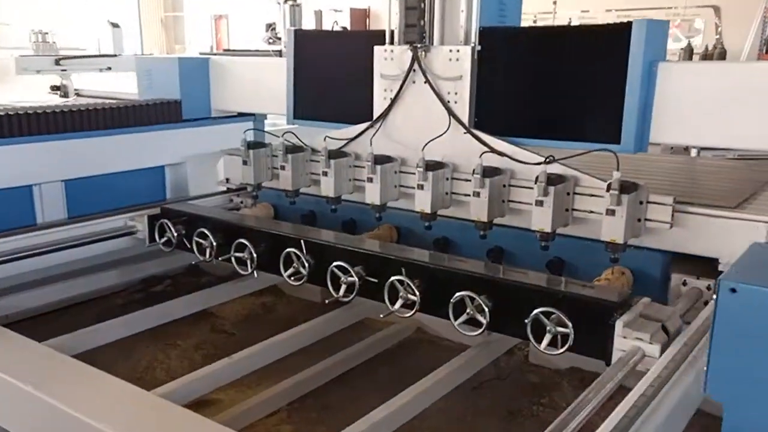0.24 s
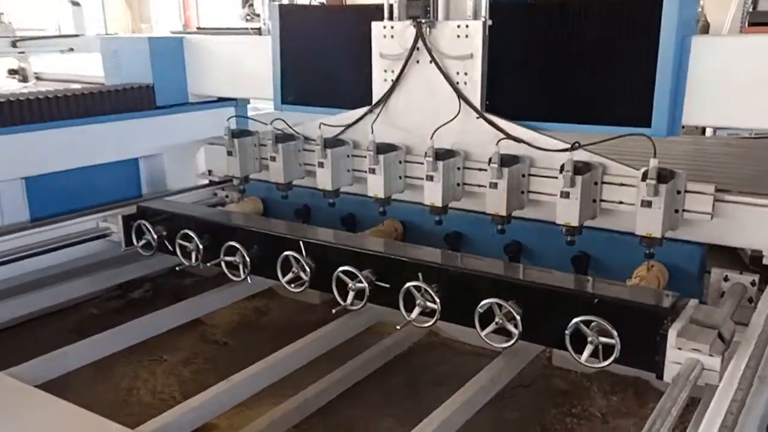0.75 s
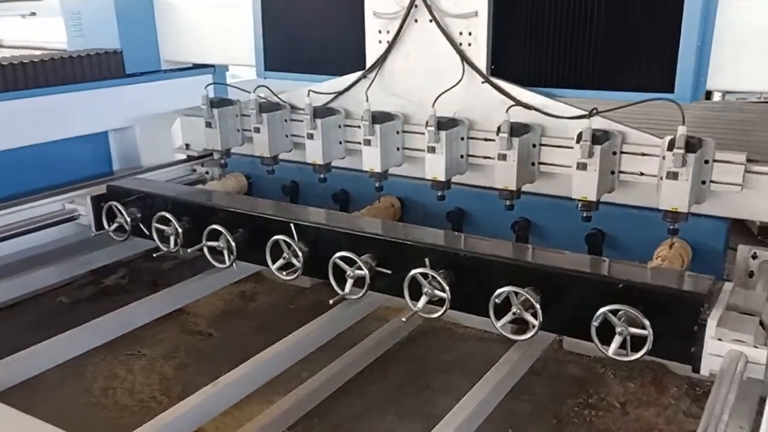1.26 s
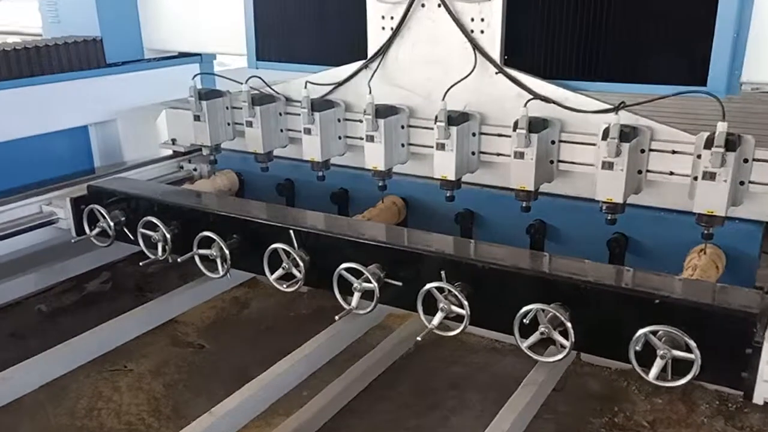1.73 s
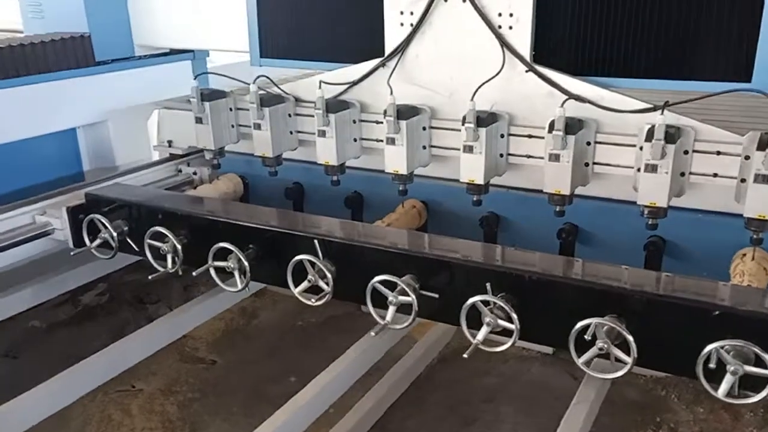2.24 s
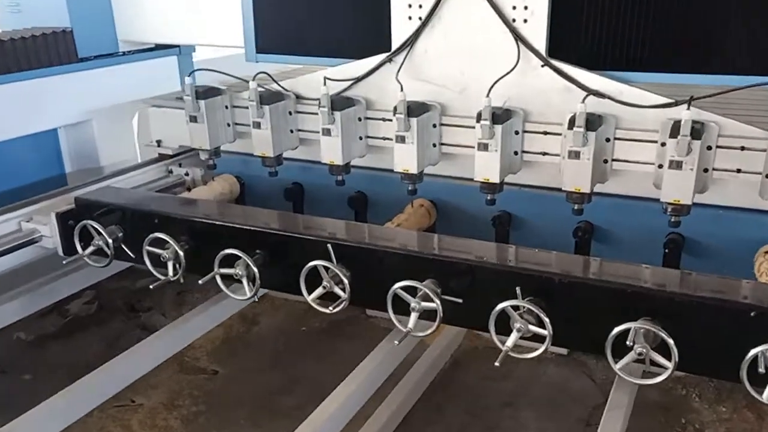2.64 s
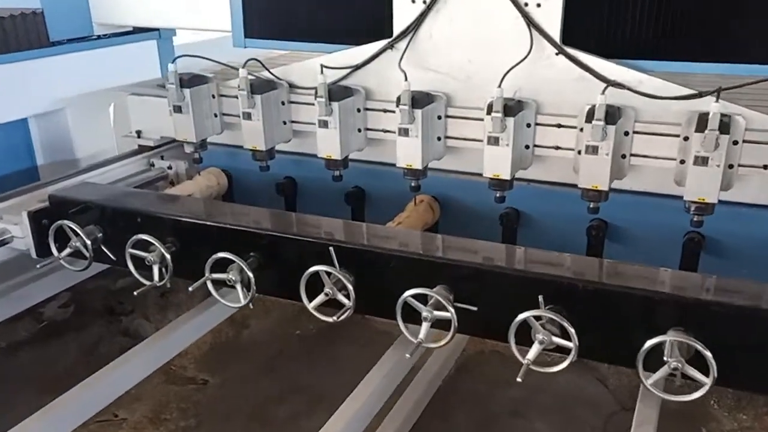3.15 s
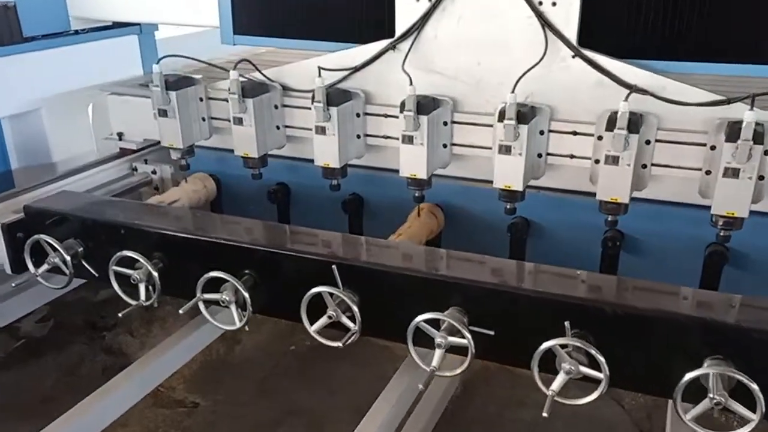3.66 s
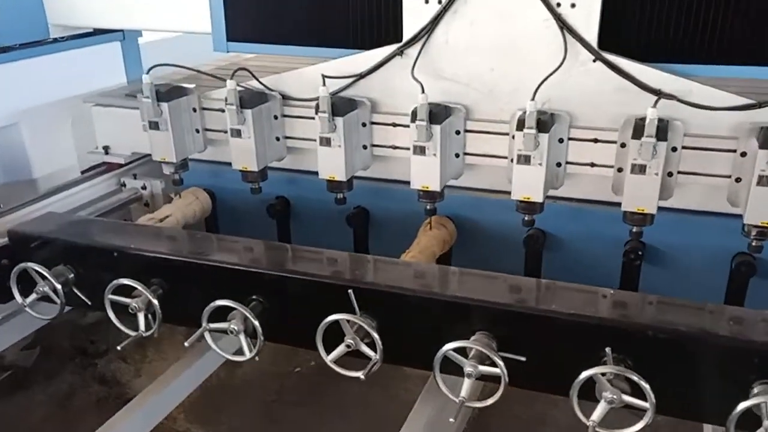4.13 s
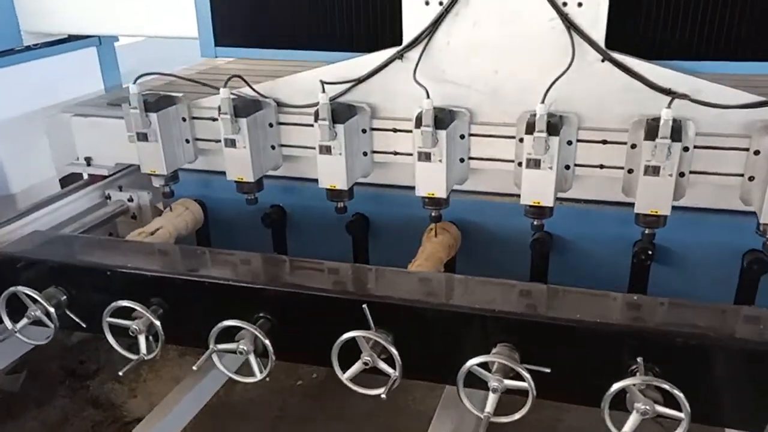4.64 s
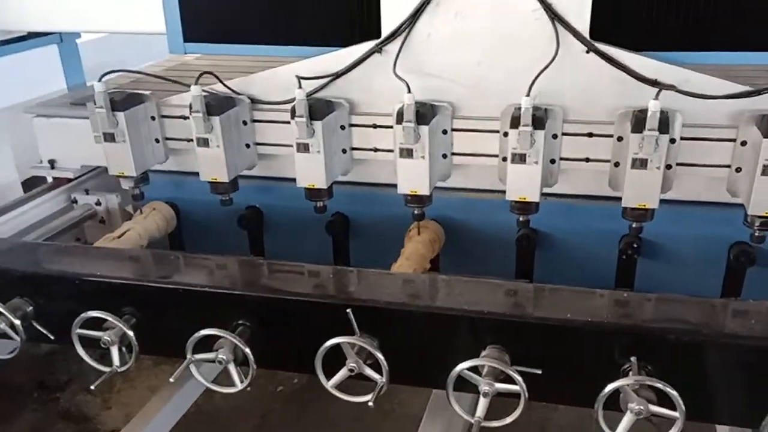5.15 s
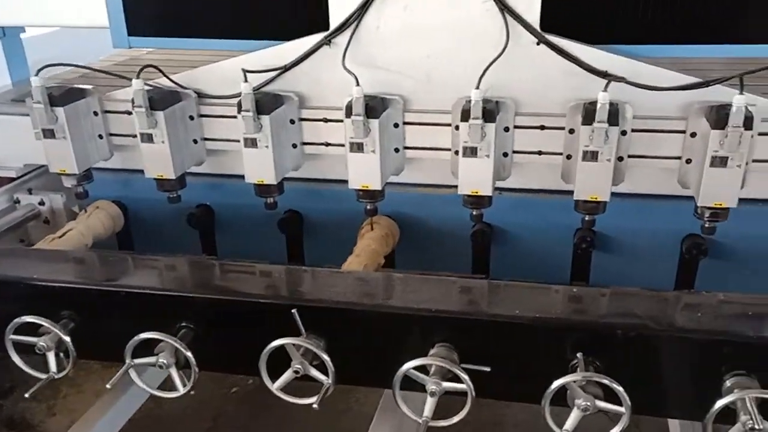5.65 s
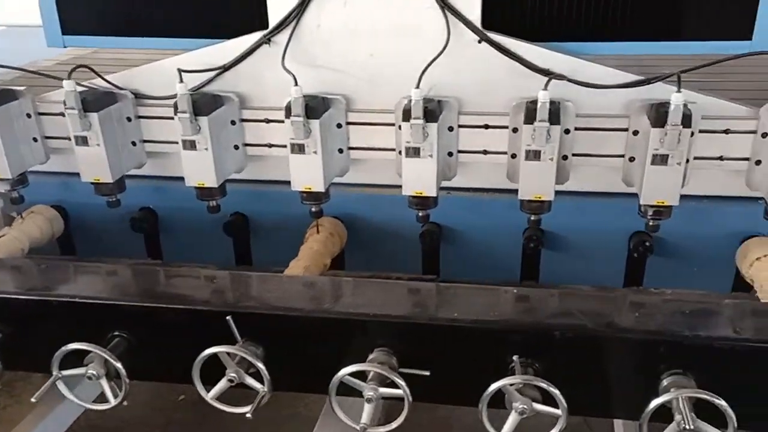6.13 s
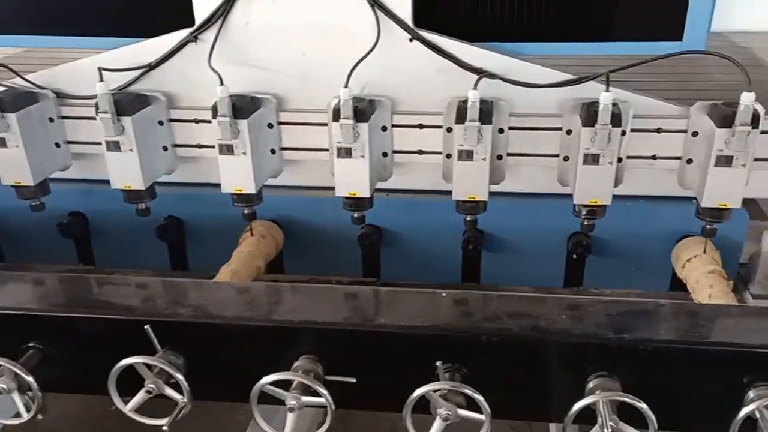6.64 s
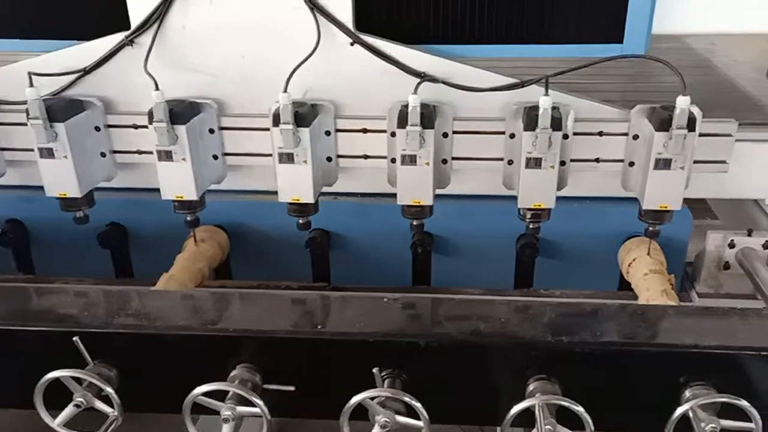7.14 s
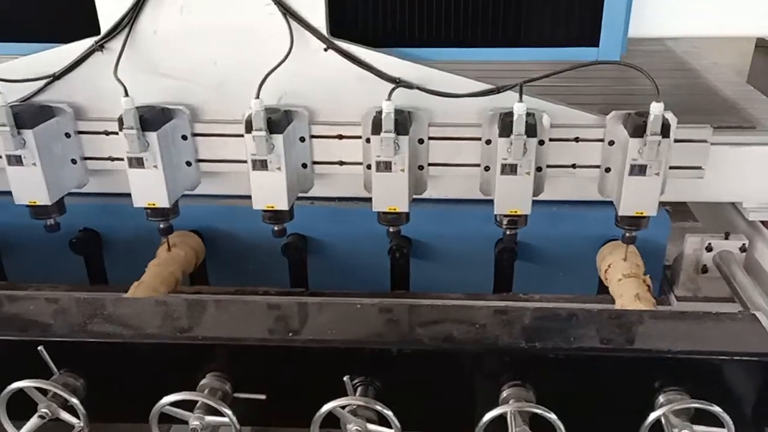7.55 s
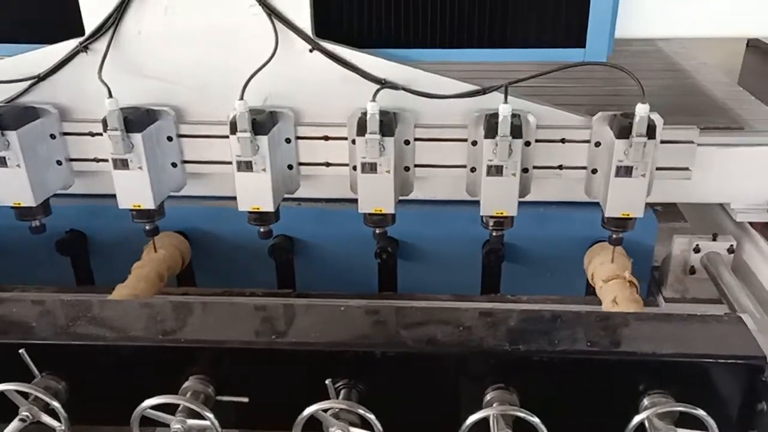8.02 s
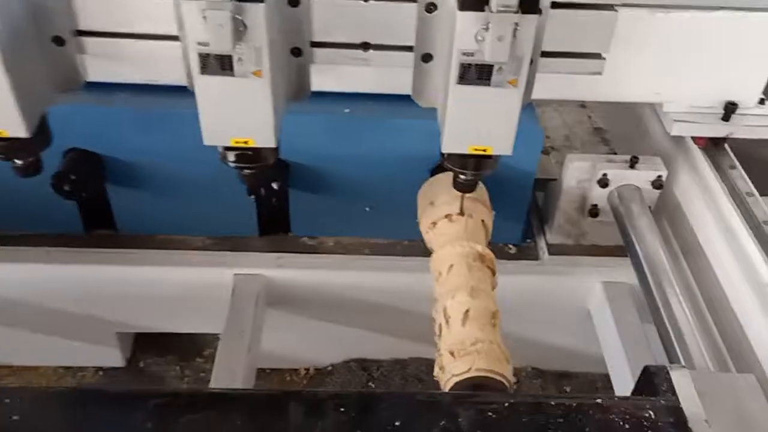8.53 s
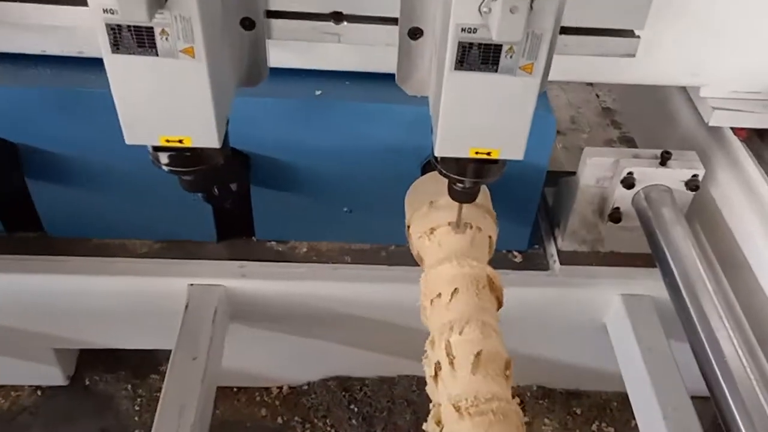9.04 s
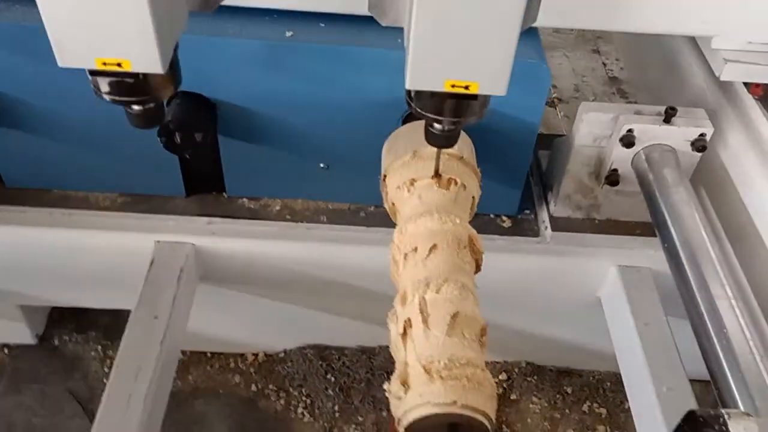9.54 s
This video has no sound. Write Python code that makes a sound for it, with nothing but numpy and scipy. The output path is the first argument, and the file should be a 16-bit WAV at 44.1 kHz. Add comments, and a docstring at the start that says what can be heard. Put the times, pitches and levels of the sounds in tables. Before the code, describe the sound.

Continuous router noise from close range: pitched spindle whine with shimmering harmonics, rushing cooling air, faint thin whistles and low hall rumble. Cutting chatter squeals at the opening, clusters between three and five seconds, and sustains near eight. Tones drift between left and right and sometimes nearly vanish into the hiss. Two soft bumps touch the handheld stereo microphone, with no speech.

```python
"""Woodworking hall: a row of air-cooled router spindles, about 300 rev/s, two-flute bits carving turning blanks.
Shaft orders are fading stereo tones phase-locked to one speed curve; fan blades sing at a fixed speed.
Rumble, roar and fan hiss are shaped noise; chatter is a gated squeal with sidebands spaced at the shaft rate.
Thin whistles hold their pitch; two soft bumps knock a hand-held microphone pair walking along the machine."""
import sys
import numpy as np
from scipy import signal
from scipy.fft import rfft, irfft, next_fast_len
from scipy.io import wavfile
from scipy.ndimage import uniform_filter1d, map_coordinates

SR = 44100
rng = np.random.default_rng(int(sys.argv[2]) if len(sys.argv) > 2 else 0)


def materialize(psi):
    """Save the field psi as 16-bit PCM at rate SR to the path in sys.argv[1].

    A 1-D psi becomes a single channel; in a 2-D psi each row is a channel.
    """
    bounded = np.clip(np.atleast_2d(psi).T, -1, 1)
    quanta = np.round(bounded * 32767).astype(np.int16)
    wavfile.write(sys.argv[1], SR, quanta)


N = 431298


def amp(db):
    """dB to linear gain."""
    return 10 ** (np.asarray(db) / 20)


def unit(x):
    """Scale to rms 1."""
    return x / np.sqrt(np.mean(np.abs(x) ** 2) + 1e-20)


def along(points, hz):
    """Interpolate (f/Hz, value) points on a log frequency axis."""
    f_hz, values = np.transpose(points)
    return np.interp(np.log(hz + 1), np.log(f_hz + 1), values)


def curves(rows):
    """Interpolate each column after t/s to one value per sample."""
    t_s, *columns = np.transpose(rows)
    return [np.interp(np.arange(N) / SR, t_s, column) for column in columns]


def wobble(knots_per_s):
    """Smooth random curve through normal-distributed knots."""
    step = 64  # samples per spline evaluation
    knots = rng.standard_normal(600)
    positions = np.arange(N // step + 2) * step * knots_per_s / SR
    coarse = map_coordinates(knots, [positions], mode="wrap")
    return np.interp(np.arange(N) / step, np.arange(len(coarse)), coarse)


def complex_wobble(knots_per_s):
    """Independent wobbles in phase and in quadrature."""
    return wobble(knots_per_s) + 1j * wobble(knots_per_s)


def filtered(x, response):
    """Apply a response(f/Hz), zero-padded."""
    size = next_fast_len(N + SR // 2)
    f_hz = np.fft.rfftfreq(size, 1 / SR)
    return irfft(rfft(x, size) * response(f_hz), size)[..., :N]


def panned(pair, db):
    """Left up and right down by half of db."""
    return pair * amp(np.array([db, -db]) / 2)


def tone(turns, db, fade, wide_db, rate):
    """Stereo tone in a hall: reflections fade it and reach the two ports at drifting strengths and phases."""
    tremble = 0.1 * complex_wobble(30.)  # fast random tremble in level and phase roughens every tone
    carrier = np.sqrt(2) * amp(db) * np.exp(2j * np.pi * (turns + rng.random()))
    mid = (1 + tremble + fade * complex_wobble(rate)) / np.sqrt(1 + 2 * fade ** 2)
    side = amp(wide_db) * unit(complex_wobble(rate))
    return np.real(carrier * [mid + side, mid - side])


# casing resonances and dips: f/Hz, width/Hz, lift/dB
CASING_MODES = [(816, 23, 8), (1027, 44, 6), (2005, 57, 1.5), (2214, 65, -10), (2428, 103, 9.5),
                (2484, 88, -21.5), (3114, 56, 7.5), (7150, 105, 6)]
# left-right coherence: f/Hz, coherence/1
PORT_COHERENCE = [(30, 0.52), (100, 1), (250, 0.6), (550, 0.19), (1200, 0.086), (2500, 0.033), (8000, .01)]


def rush(spectrum, patchy_db):
    """Noise through the casing modes, in random time-frequency gain patches; mid rms 1."""
    z = signal.stft(rng.standard_normal((2, N)), nperseg=512)[2]
    across_bins = uniform_filter1d(rng.standard_normal(z.shape[1:]), 6, axis=0)
    field = uniform_filter1d(across_bins, 20, axis=1)
    pair = signal.istft(z * amp(patchy_db * unit(field)), nperseg=512)[1][:, :N]

    def mid_side_response(hz):
        lift_db = sum(db / (1 + (2 * (hz - f) / width) ** 2) for f, width, db in CASING_MODES)
        angle = np.arccos(np.clip(along(PORT_COHERENCE, hz), -1, 1)) / 2
        return amp(along(spectrum, hz) + lift_db) * [np.ones_like(hz), np.tan(angle)]

    mid, side = filtered(pair, mid_side_response)
    return np.array([mid + side, mid - side]) / np.std(mid)


# hall rumble level: t/s, level/dB
RUMBLE_LEVEL = [(0.06, -59), (1.08, -57), (2.15, -51), (3.04, -55), (3.71, -54.5), (4.36, -56), (4.76, -54),
                (5.43, -58), (6.07, -59), (7.31, -53.5), (8.89, -55.5), (9.7, -53)]
# relative rumble density before casing lift: f/Hz, density/dB per Hz
RUMBLE_SPECTRUM = [(20, -16), (60, -3.5), (110, 1), (200, 2), (420, -7), (900, -48)]


def rumble():
    """Low noise of the hall, with a wavering level."""
    level_db = curves(RUMBLE_LEVEL)[0] + 2.5 * wobble(4.5)
    return amp(level_db) * rush(RUMBLE_SPECTRUM, patchy_db=-0.8)


# machine air: t/s, roar level/dB, hiss level/dB, hiss left-right/dB (mean removed in use)
AIR_LEVELS = [(0.0, -27, -29.5, -3.5), (0.65, -26, -30, -2.0), (1.47, -26, -30, -1.5), (1.74, -24, -27, -1),
              (2.04, -21.5, -26, -1.5), (2.94, -25, -28, -1.0), (3.49, -23.5, -27.5, 0),
              (3.87, -25, -28, 0.5), (4.22, -26, -30, -1.0), (4.79, -26, -29.5, -0.5),
              (5.23, -28, -31.5, -1.0), (5.64, -28, -31.5, -1.5), (5.99, -24, -26, -0.5),
              (6.18, -22, -25.5, -1.5), (6.45, -22.5, -27, -2.5), (6.62, -25, -28, 0), (7.0, -24, -27, -1),
              (7.33, -23.5, -27, -2.0), (7.68, -27.5, -30, -2.5), (8.33, -29, -32, -3.5),
              (8.5, -27.5, -31, -2), (8.83, -28.5, -31, 0.5), (9.15, -24, -25.5, 1.0),
              (9.78, -25.5, -29, 4.5)]
# relative densities before casing lift: f/Hz, density/dB per Hz
ROAR_SPECTRUM = [(100, -75), (240, -20), (390, -20), (540, -6), (720, -8.5), (900, -6.5), (1290, -8.5),
                 (1740, -2), (2350, 2.5), (2960, 0), (3080, -23), (3600, -15), (7900, -75)]
HISS_SPECTRUM = [(1760, -62), (3000, -9), (5380, -8.5), (6800, -4.5), (7860, -9), (9390, -7.5),
                 (10600, -21.5), (11600, -15.5), (12200, -29), (13300, -15), (14100, -26), (14600, -35),
                 (15100, -49), (15500, -21)]


def air():
    """Broadband roar of the frame and hiss of the cooling fans."""
    roar_db, hiss_db, pan_db = curves(AIR_LEVELS)
    roar = amp(roar_db + 0.11 * wobble(1.9)) * rush(ROAR_SPECTRUM, patchy_db=1.78)
    hiss = amp(hiss_db + 0.56 * wobble(5.)) * rush(HISS_SPECTRUM, patchy_db=1.1)
    return roar + panned(hiss, pan_db - pan_db.mean())


def fan_blades():
    """Blade-passing tone of the idle spindles: fixed speed, level tied to the fan hiss."""
    blades, idle_rev_per_s, blade_re_hiss_db = 22, 299.7, -10
    turns = blades * idle_rev_per_s * np.arange(N) / SR
    level_db = curves(AIR_LEVELS)[1] + blade_re_hiss_db
    return tone(turns, level_db, fade=0.7, wide_db=-1.5, rate=7.7)


# thin whistles, perhaps of the motor drives: f/Hz, level/dB
WHISTLES = [(5302, -53), (10692, -63), (12495, -65)]


def whistles():
    """Fixed-pitch thin tones, independent of the shaft."""
    t_s = np.arange(N) / SR
    return sum(tone(hz * t_s, db, fade=.5, wide_db=-1.5, rate=5.) for hz, db in WHISTLES)


# soft bumps against the microphones: t/s, level/dB, f/Hz, t60/s
BUMPS = [(3.312, -39, 168, 0.092), (9.274, -36, 110, 0.022)]


def knocks():
    """Each bump: a decaying low push with a puff of smoothed noise, added equally to both ports."""
    out, t_s = np.zeros(N + SR), np.arange(SR // 5) / SR
    for start_s, db, hz, t60_s in BUMPS:
        puff = 1.9 * uniform_filter1d(rng.standard_normal(len(t_s)), size=30)
        push = np.sin(2 * np.pi * hz * t_s) + puff
        envelope = amp(db - 60 * t_s / t60_s) * (1 - np.exp(-t_s / .001))
        out[round(start_s * SR):][:len(t_s)] += envelope * push
    return out[:N]


# carving spindle speed, slower in a deeper cut: t/s, f/Hz (rev/s)
SHAFT_SPEED = [(0, 299.1), (.5, 299.2), (1.1, 299.95), (2, 299.8), (2.6, 299.5), (3, 299.7), (3.3, 299.1),
               (3.9, 299.1), (4.2, 299.5), (5, 299.1), (5.4, 299.7), (6.2, 299.45), (6.8, 299.6),
               (7.4, 298.95), (8.6, 299.05), (9.78, 299.1)]


def shaft_turns():
    """Integrate shaft speed to revolutions."""
    return np.cumsum(curves(SHAFT_SPEED)[0]) / SR


# chatter spells: t/s, length/s, bit bending f/Hz, final shift/Hz, start level/dB, level drift/dB
CHATTER_SPELLS = [(-.04, 0.79, 2272, -6.5, -21.5, -16), (0.601, 0.096, 2257, 5, -27, 1),
                  (0.744, 0.15, 2280, 61, -25, -8), (3.191, 0.1, 2262, -0.5, -27, 4),
                  (3.315, .13, 2260, 57, -17, -11), (3.678, 0.15, 2262, -9.5, -21, -17),
                  (3.935, .12, 2275, 67, -18.5, -10), (4.438, .1, 2258, -7, -29, -1),
                  (4.603, .11, 2290, 11.5, -30, -1), (4.764, 0.29, 2266, 79, -34, 4),
                  (5.44, 0.12, 2280, 54, -35, 10), (5.97, .15, 2335, 41, -33, 4),
                  (7.156, .275, 2268, 52, -20, -13), (7.449, 1.1, 2270, 80, -24.5, -1),
                  (8.6, 0.081, 2316, -9, -22, -3)]
# sideband offset from the bending pitch: multiples of the shaft rate
SIDEBAND_ORDERS = [-4, -2, -1, 0, 1, 2, 3, 4]
# per sideband order: level re spell/dB (before the loss while leaving), left-right/dB
SIDEBAND_LEVELS = [(-18, 2), (-13, 8), (-22, 0), (0, -4), (-13, -3), (-10, -1), (-20, -3), (-22, 0)]


def chatter():
    """The bit bends at its own pitch; shaft turns chop the squeal into sidebands."""
    attack_s, release_s, shift_s, shift_power = 0.051, .05, .19, 1.2
    leaving_loss_db = -12  # chopping weakens as the bit leaves the wood and the pitch shifts
    turns, t_s = shaft_turns(), np.arange(N) / SR
    hz, level, leaving = np.zeros((3, N))
    for start_s, length_s, pitch_hz, shift_hz, db, drift_db in CHATTER_SPELLS:
        on = (t_s >= start_s) & (t_s < start_s + length_s)
        since_s = t_s[on] - start_s
        left_s = start_s + length_s - t_s[on]
        leaving[on] = np.clip(1 - left_s / min(shift_s, length_s), 0, 1)
        hz[on] = pitch_hz + shift_hz * leaving[on] ** shift_power
        gate = np.clip(np.minimum(since_s / attack_s, left_s / release_s), 0, 1)
        level[on] = amp(db + drift_db * since_s / length_s) * gate
    bending = np.cumsum(hz) / SR
    squeal = np.zeros((2, N))
    for order, (db, pan_db) in zip(SIDEBAND_ORDERS, SIDEBAND_LEVELS):
        sideband_db = db + (order != 0) * leaving_loss_db * leaving
        line = tone(bending + order * turns, sideband_db, fade=0.087, wide_db=-9, rate=2.5)
        squeal += panned(line, np.array([pan_db]))
    octave = tone(2 * bending, -23, fade=.7, wide_db=-3, rate=4.)
    return level * (squeal + octave)


# flute tone, swelling as the bits dig in: t/s, level/dB, left-right/dB
FLUTE_LEVEL = [(0.0, -24, 6), (0.13, -25.5, -17), (0.24, -19.5, -6.0), (0.54, -28.5, 12), (0.71, -22, 4.0),
               (0.79, -31, 25), (0.92, -30.5, -9), (1.01, -19.5, -0.5), (1.42, -38.5, 13), (1.5, -34, 16),
               (1.58, -52, -2.0), (1.69, -35, 4.5), (1.74, -40, -8.5), (1.96, -34, 1), (2.07, -21.5, -8.5),
               (2.37, -18.5, -4.5), (2.45, -28.5, -2.0), (2.53, -34.5, -18), (2.67, -28, 0), (2.75, -20, 1),
               (3.05, -28, 1), (3.27, -17.5, -3.0), (3.43, -20.5, -2), (3.57, -13.5, 1.5),
               (4.08, -16, -5.5), (4.36, -35.5, 2), (4.49, -21, -3), (4.87, -15, -0.5), (5.07, -15.5, 0.5),
               (5.31, -29, 6), (5.42, -26, 3), (5.53, -35, 4), (5.61, -35.5, 24), (5.75, -30, -3.5),
               (5.88, -46, -12), (6.02, -38, 8), (6.1, -19, 0), (6.18, -24.5, 1), (6.29, -26.5, -8),
               (6.45, -20.5, 2), (6.59, -43, -11.0), (6.67, -49, -1), (7.25, -22, 2), (7.35, -27.5, 8),
               (7.41, -29, -8.0), (7.46, -19.5, -3.5), (8.04, -16.5, 2), (8.44, -17.5, 3),
               (8.61, -32.5, 11), (8.69, -34, 16), (8.85, -35.5, -16), (8.91, -42, 1), (9.2, -30, 3.0),
               (9.48, -31.5, -12.5), (9.64, -19, -7.5), (9.78, -17, -1)]


def cutting_effort_db():
    """Flute level about its mean, smoothed over 6000 samples."""
    flute_db = curves(FLUTE_LEVEL)[0]
    return uniform_filter1d(flute_db - flute_db.mean(), size=6000)


# faint shaft orders, multiples of shaft speed
FAINT_ORDERS = [5, 11, 12, 13, 14, 15, 16]
# per faint order: level at mean effort/dB
FAINT_LEVELS = [-41.5, -51, -50, -49, -49.5, -51, -52]


def faint_orders():
    """Weak shaft harmonics; deep random fading stands for beats between nearly equal spindles."""
    turns = shaft_turns()
    follow_db = 0.27 * cutting_effort_db()  # dB per dB of flute tone
    return sum(tone(order * turns, db + follow_db, fade=1.0, wide_db=4.0, rate=5.5)
               for order, db in zip(FAINT_ORDERS, FAINT_LEVELS))


# clear shaft orders, multiples of shaft speed
WHINE_ORDERS = [6, 7, 8, 9, 10]
# per clear order: steady level at mean effort/dB
WHINE_LEVELS = [-39.5, -42, -37.5, -42, -37.5]
# per clear order, swells along the walk through standing waves: t/s, added peak level/dB, Gaussian sigma/s
WHINE_SWELLS = [
    [(1.25, -32, .04), (1.47, -35, 0.032), (2.1, -37, .05), (2.59, -32, 0.06), (2.78, -33, 0.027),
     (3.87, -35, 0.16), (4.82, -34, 0.11), (5.5, -35, 0.077), (6.21, -32.5, .05), (7.33, -30, .07),
     (7.9, -37, 0.042), (8.63, -40, 0.051), (9.66, -33, .05)],
    [(.02, -36, 0.063), (.22, -35, .08), (.52, -34, .05), (.74, -37, .06), (1.03, -36, .04),
     (2.1, -30, 0.054), (3.27, -29, 0.031), (3.88, -24, 0.066), (4.63, -28, 0.054), (5.15, -31, 0.066),
     (5.47, -33, 0.043), (6.07, -29, .04), (6.21, -34, .04), (7.17, -29, .06), (7.36, -26, .05)],
    [(0.01, -37, .05), (.3, -29, 0.12), (.72, -31.5, 0.053), (1.03, -31, 0.1), (1.39, -30, 0.038),
     (2.28, -25, 0.066), (2.7, -26.5, 0.055), (2.86, -25, 0.025), (3.0, -32, 0.034), (3.6, -33, 0.15),
     (4.03, -33, 0.036), (6.3, -31, .1), (7.16, -24, .04), (7.33, -27, .03), (8.47, -35, 0.039),
     (9.48, -23.5, 0.038), (9.7, -32, 0.033)],
    [(.42, -40, .1), (1.09, -37, 0.053), (3.0, -29, .04), (3.27, -29, .04), (3.54, -32, 0.078),
     (7.33, -41, .05), (7.9, -35, .15), (9.12, -33, .06)],
    [(.39, -28, 0.037), (.54, -27, .045), (1.97, -32.5, 0.22), (2.65, -31, .07), (4.6, -36, .07),
     (5.69, -38.5, 0.062), (7.35, -26.5, .08), (7.65, -28, .04), (8.01, -40, .05), (9.12, -34, 0.044),
     (9.45, -31, 0.032), (9.67, -28, 0.057)],
]


def whine():
    """Cutting-edge harmonics: a steady fading part plus standing-wave swells."""
    turns, t_s = shaft_turns(), np.arange(N) / SR
    coarse_s = t_s[::64]
    follow_db = 0.15 * cutting_effort_db()  # dB per dB of flute tone
    sound = np.zeros((2, N))
    for order, db, swells in zip(WHINE_ORDERS, WHINE_LEVELS, WHINE_SWELLS):
        steady = amp(db + follow_db)
        swell = sum(amp(top_db) * np.exp(-((coarse_s - s) / sigma_s) ** 2 / 2)
                    for s, top_db, sigma_s in swells)
        both = steady + np.interp(t_s, coarse_s, swell)
        fade = 0.58 * steady / both  # swells fade less
        sound += both * tone(order * turns, 0, fade=fade, wide_db=-1.5, rate=11.)
    return sound


# levels along the walk of the unbalance hum (shaft order 1), then of shaft orders 3 and 4: t/s, level/dB
HUM_LEVEL = [(0.0, -34.5), (0.22, -52), (0.38, -31), (0.63, -28.5), (1.66, -38), (2.07, -32), (2.45, -40),
             (2.7, -36), (3.02, -39), (3.1, -50.5), (3.65, -31), (4.08, -37), (4.71, -33.5), (4.79, -36),
             (6.18, -25.5), (6.86, -32), (7.41, -27.5), (8.44, -43.5), (8.66, -56), (8.74, -40), (9.2, -36),
             (9.78, -38.5)]
THIRD_LEVEL = [(0.0, -47), (0.49, -41), (0.6, -28), (2.01, -49.5), (2.12, -26), (2.56, -47), (2.75, -37),
               (4.68, -46.5), (4.74, -53), (5.07, -36), (5.31, -56), (5.56, -37), (5.64, -50), (6.45, -37),
               (6.51, -48), (7.38, -46), (7.73, -31.5), (8.8, -43), (9.12, -30.5), (9.48, -37.5),
               (9.64, -29), (9.78, -40)]
FOURTH_LEVEL = [(0.0, -30), (0.24, -24.5), (0.95, -34.5), (1.03, -28), (1.17, -44), (1.88, -45),
                (2.15, -26.5), (2.72, -39), (2.89, -32), (2.97, -41), (4.25, -33.5), (4.57, -42),
                (4.79, -27.5), (5.12, -22), (5.28, -35), (5.61, -38), (5.66, -29), (5.77, -54), (6.29, -31),
                (6.51, -31), (6.59, -52), (7.08, -46), (7.19, -32), (7.6, -46), (7.79, -30.5),
                (8.47, -31.5), (8.55, -49), (9.62, -34), (9.67, -47), (9.78, -29)]


def spindles():
    """Shaft orders 1 to 4: order 1 is unbalance, order 2 the passing of two flutes."""
    turns = shaft_turns()
    flute_db, flute_pan_db = curves(FLUTE_LEVEL)
    hum = tone(turns, curves(HUM_LEVEL)[0], fade=0.11, wide_db=-13.5, rate=1.426)
    flutes = panned(tone(2 * turns, flute_db, fade=.07, wide_db=-18, rate=5.), flute_pan_db)
    third = tone(3 * turns, curves(THIRD_LEVEL)[0], fade=.25, wide_db=-12, rate=4.2)
    fourth = tone(4 * turns, curves(FOURTH_LEVEL)[0], fade=0.16, wide_db=-31, rate=3.0)
    return hum + flutes + third + fourth


def scene():
    """Sum of background, chatter and shaft orders."""
    background = rumble() + air() + fan_blades() + whistles() + knocks()
    return background + chatter() + faint_orders() + whine() + spindles()


# colour difference of the microphone ports: f/Hz, left-right/dB
PORT_COLOUR = [(60, 0), (250, 0), (600, 0), (1000, -2.5), (1800, -5.5), (2740, -4), (4000, 2), (6100, -3),
               (7250, -9.5), (8200, 5.5), (9400, 9.5), (10800, 16.5), (12000, -0.5), (15000, 7)]


def record(dry):
    """Two differently coloured ports, soft peak limiting, then a sharp band limit."""
    ceiling, top_hz = .9, 15560

    def port_response(hz):
        left = amp(along(PORT_COLOUR, hz) / 2)
        return np.array([left, 1 / left])

    x = filtered(dry, port_response)
    x = x / (1 + np.abs(x / ceiling) ** 6) ** (1 / 6)
    return filtered(x, lambda hz: hz < top_hz)


dry = scene()
out = record(dry)
materialize(out)
```